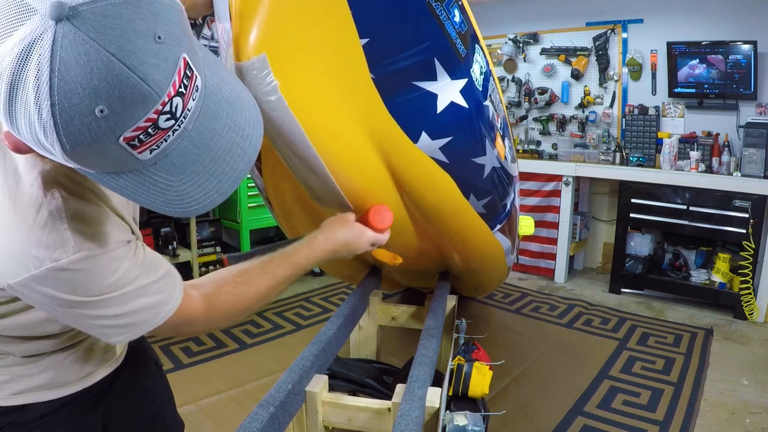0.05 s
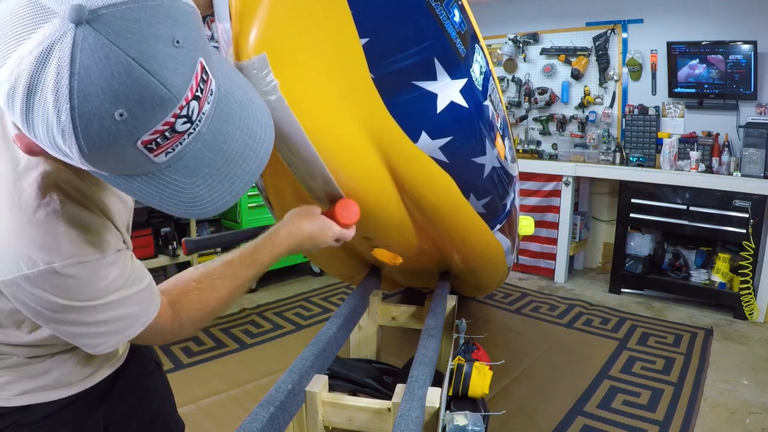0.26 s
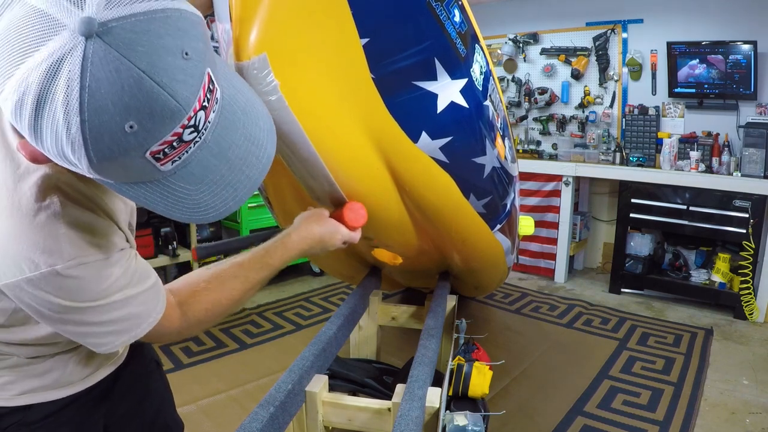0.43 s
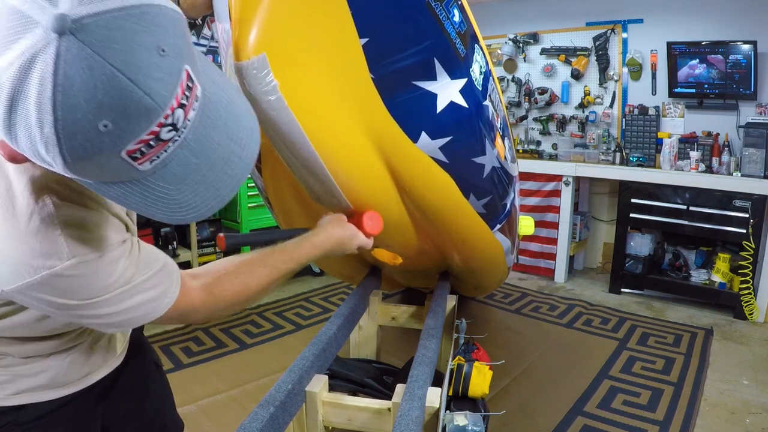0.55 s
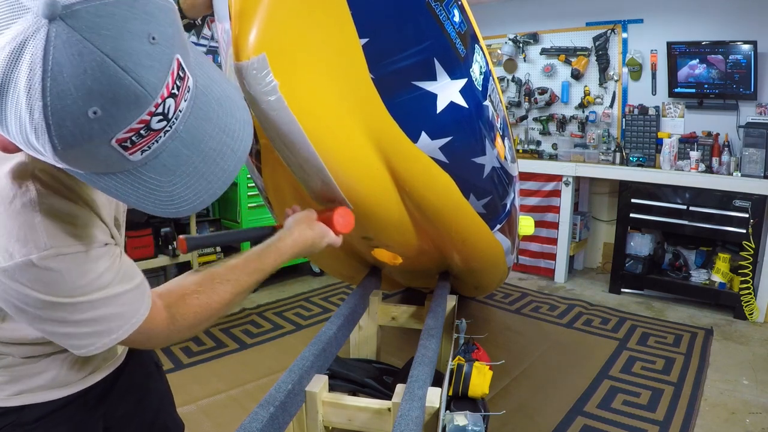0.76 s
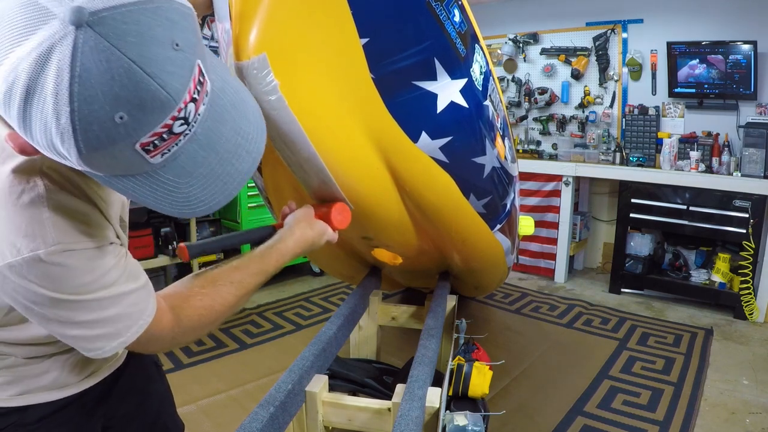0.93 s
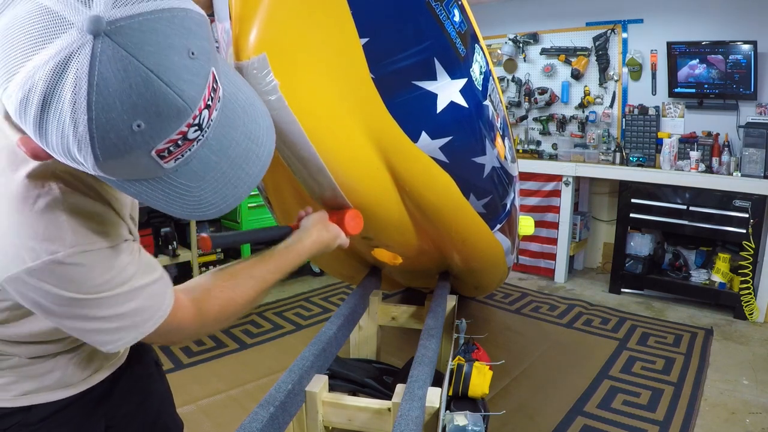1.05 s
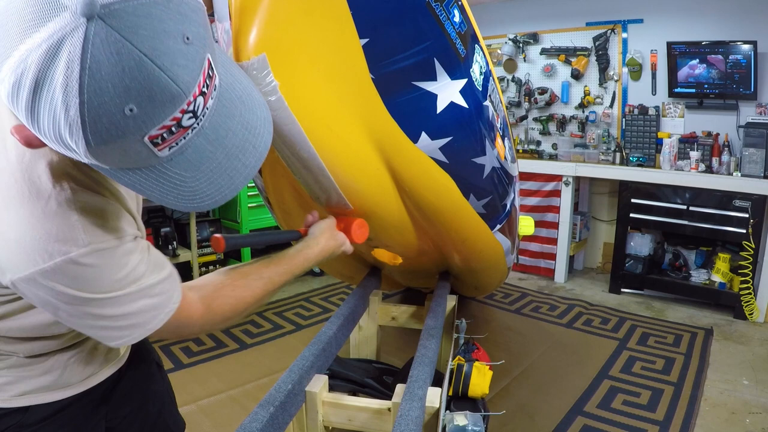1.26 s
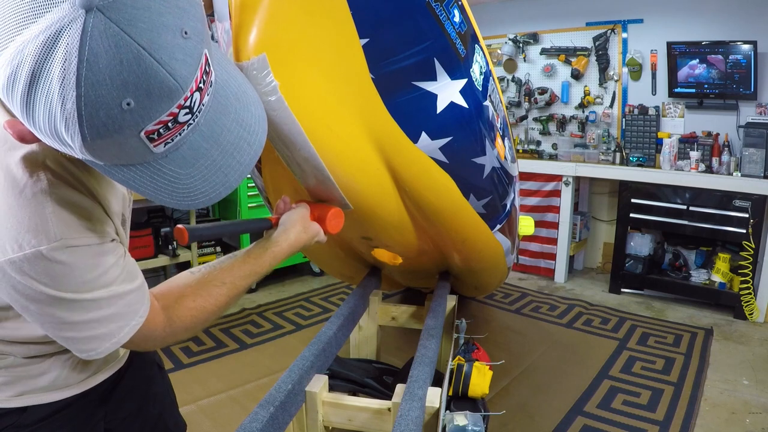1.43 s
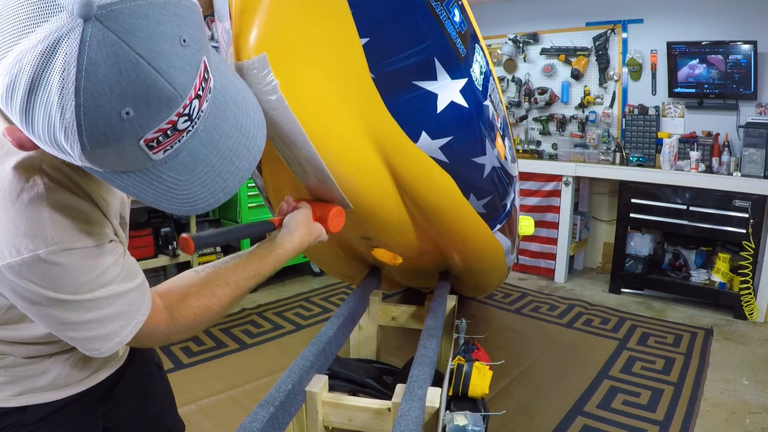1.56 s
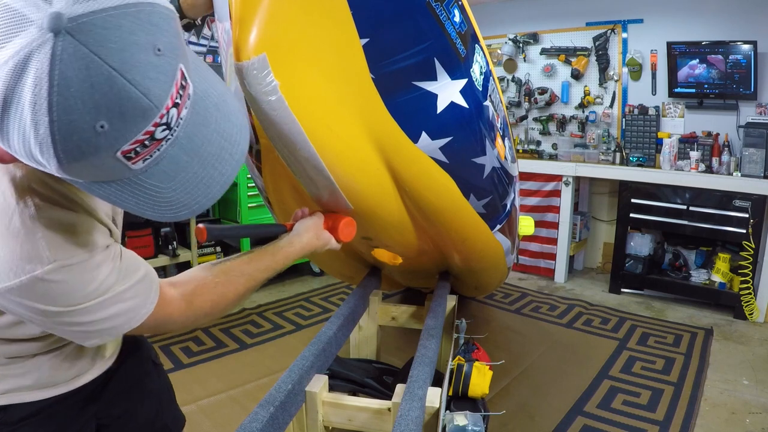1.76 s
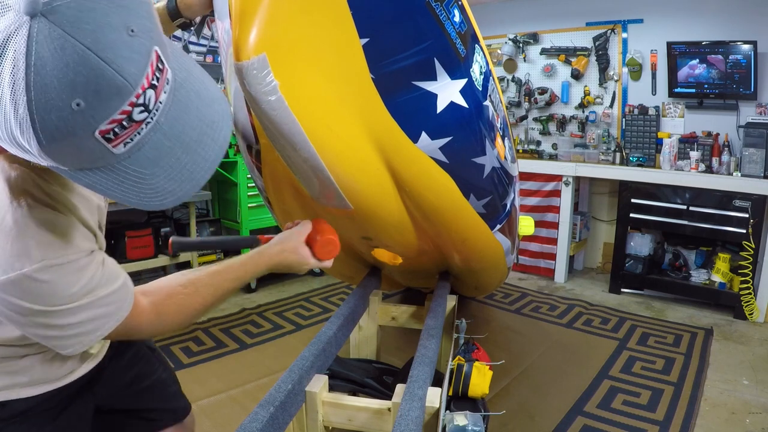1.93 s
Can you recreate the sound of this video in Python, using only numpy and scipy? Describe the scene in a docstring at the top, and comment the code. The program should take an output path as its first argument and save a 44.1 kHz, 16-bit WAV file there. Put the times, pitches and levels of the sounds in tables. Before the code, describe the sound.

A rubber mallet knocks on a hollow plastic kayak three times, each firm blow followed by a lighter tap. The hull booms briefly in a garage, with soft rubbing between blows and a faint machine hum behind.

```python
"""Mallet on a kayak hull

A rubber mallet knocks a plastic kayak in a garage: three firm blows, each followed by a lighter tap.
Bending waves reach the air treble first, the hollow hull booms and the garage rings on.
Between blows the mallet and hand slide softly and nudge the hull, over a faint machine hum."""
import sys
import numpy as np
from scipy import signal
from scipy.fft import rfft, irfft
from scipy.io import wavfile

SR = 44100
rng = np.random.default_rng(int(sys.argv[2]) if len(sys.argv) > 2 else 0)


def wav_record(signal):
    """Record a signal, one row per channel, as 16-bit PCM in the file named by sys.argv[1]."""
    frames = np.transpose(np.atleast_2d(signal))
    bounded = np.clip(frames, -1, 1)
    # unit amplitude maps onto the largest positive 16-bit level
    quanta = np.round(bounded * 32767).astype(np.int16)
    wavfile.write(sys.argv[1], SR, quanta)


N = 88200

# room tone EQ: f/Hz, level/dB
ROOM_TONE_EQ = [(15, -52), (25, 2.5), (90, -1.5), (257, -9), (374, -8), (428, 3), (606, -12.5), (712, -7),
                (1150, -15), (15100, -29.5)]
# hum bands: f/Hz, width/Hz, level/dB
HUM_BANDS = [(306, 53, -76.5), (423, 16, -73.5), (557, 10, -79)]
# garage decay: f/Hz, t60/s
GARAGE_DECAY = [(50, 0.26), (130, 0.32), (350, .5), (920, 0.89), (2400, 0.57), (8000, 0.35)]
# reverb EQ: f/Hz, level/dB
GARAGE_EQ = [(50, -9), (150, 4), (400, 0.5), (750, -0.5), (1150, -4), (2200, 0.5), (6000, -0.5)]
# five resonances of rubbing: f/Hz, width/Hz
SCUFF_BANDS = [(1700, 1770), (3300, 2000), (5200, 2340), (8000, 3120), (13300, 4900)]
# rubbing strokes: t/s, length/s, then level/dB for each scuff band
RUB_STROKES = [(.10, 0.16, -85, -78.5, -96, -98, -99), (0.223, 0.079, -62.5, -70, -72, -74.5, -77),
               (.41, 0.12, -61, -70.5, -80, -77, -79), (0.468, 0.14, -64, -71.5, -73.5, -71, -74.5),
               (.81, 0.082, -82, -77, -81, -76.5, -76), (.93, 0.25, -64, -76, -85, -83, -85),
               (1.044, 0.16, -69.5, -68.5, -83, -69, -76), (1.36, 0.031, -91, -91, -92, -76, -82),
               (1.448, 0.084, -79, -73, -74, -72.5, -79), (1.57, 0.3, -66.5, -77, -93, -81.5, -89),
               (1.678, 0.096, -71, -73.5, -77.5, -73, -83), (1.788, 0.15, -63.5, -71, -72.5, -71.5, -75.5),
               (1.92, 0.088, -69.5, -75.5, -74.5, -74, -79)]
# envelope of the low murmur in the hull: t/s, level/dB
MURMUR_ENVELOPE = [(0, -49.5), (.1, -73.5), (.2, -68.5), (.36, -91), (.45, -51.5), (.6, -55), (.7, -85),
                   (.93, -63), (1.02, -47), (1.15, -49), (1.25, -88), (1.55, -57), (1.65, -51.5),
                   (1.75, -51.5), (1.85, -69), (2, -68.5)]
# small ticks: t/s, level/dB, f/Hz
SMALL_TICKS = [(0.223, -44, 8300), (0.481, -56, 5970), (0.813, -49.5, 6000), (0.826, -53, 4000),
               (1.4322, -50.5, 5450), (1.894, -61, 13680), (1.892, -48, 1930)]
# the mallet head's own ring: f/Hz, level/dB, t60/s
HEAD_MODES = [(2048, 1, 0.012), (2630, 7, 0.004), (3180, -13.5, 0.018)]
# the hollow hull's modes: f/Hz, level/dB, t60/s
HULL_MODES = [(61.6, -6, 0.34), (74.85, -3, 0.33), (104.1, 2.5, 0.162), (141.6, 4.5, 0.25),
              (172, -12, 0.26), (224.6, 2, 0.066), (301.2, 1, 0.14), (365.4, -5.5, 0.13), (518.3, -9, 0.27),
              (585.5, -13, 0.39), (737.7, -10, 0.24), (860, -29.5, 0.27), (949, -10, 0.078),
              (1033, -13.5, 0.11), (1092.6, -18, 0.27), (1515, -8.5, 0.064)]
# EQ of the bending wave: f/Hz, level/dB
WAVE_EQ = [(40, -28), (150, 8.5), (400, 0.5), (1000, 2), (2000, -7), (4000, -20), (9000, -50)]
# its echoes from the hull's edges: delay/s, level/dB
EDGE_ECHOES = [(.0045, -8), (.008, -14), (.0112, -4.), (.017, -13.5), (.023, -9.5), (.031, -9)]
# blows and taps: t/s, level/dB, contact/s, brightness/(dB per octave), boom/dB, upper ring/dB,
# clack/dB, clack delay/s, second touch/dB
MALLET_BLOWS = [(.2270, -15.5, 0.0016, 1.5, -3, -4, -45.5, 0.00067, -25),
                (0.4806, -25, 0.0018, -4., -5, 6, -62, 0.003, -26),
                (0.7948, -20, 0.002, 2.5, 1.5, 7, -70, 0.037, -20.5),
                (1.0449, -30, .002, 0, -0.5, -2, -39.5, 0.00063, -14.5),
                (1.4310, -21.5, 0.0023, 4.5, -2, 7.5, -46, 0.0049, 18),
                (1.6806, -28, 0.0018, -2, -2.5, 9.5, -48.5, 0, -21.5)]
# soft nudges of the hull: same columns
HULL_NUDGES = [(1.008, -49, 0.0097, -2., -6, 0., -80., 0.0092, -20.),
               (1.153, -48, 0.0078, -2.2, 3., 0.0039, -75, 0., -20.),
               (1.645, -42, 0.0064, -1., 5, 0., -80., 0.0074, -13),
               (1.78, -50.5, 0.0042, -0.21, -11, 0.0079, -83, 0., -16)]

ROOM_TONE_DB, REVERB_DB, WAVE_DB = -63.5, -8.5, -3
GRAIN_SPREAD_DB, GRAINS_PER_S = 2, 9800
STROKE_ATTACK = 0.21  # share of a stroke spent rising
BOOM_BELOW_HZ, UPPER_RING_ABOVE_HZ = 160, 800
LOW_CUT_HZ, HIGH_CUT_HZ = 62.4, 15280  # the hull radiates little under the first; the mix ends at the second
TRAVEL_S = .0024  # bending wave's travel time at 1 kHz, longer in the bass
BOUNCE_S, CLACK_ATTACK_S = 0.000943, 0.00032


def amp(db):
    return 10 ** (np.asarray(db) / 20)


def unit_rms(x):
    return x / np.sqrt(np.mean(x ** 2) + 1e-20)


def curve_at(points, hz):
    f, value = np.transpose(points)
    return np.interp(np.log(hz + 1), np.log(f + 1), value)


def place(mix, start, sound):
    part = mix[round(start * SR):][:len(sound)]
    part += sound[:len(part)]


def filtered(x, gain):
    """EQ by a gain per frequency bin, then set the rms to 1."""
    return unit_rms(irfft(rfft(x) * gain, len(x)))


def struck(modes, size):
    """Decaying sines after one impulse."""
    t = np.arange(size) / SR
    return sum(amp(db - 60 * t / t60) * np.sin(2 * np.pi * hz * t) for hz, db, t60 in modes)


def room_tone():
    """A bed of dark noise with the fuzzy hum of distant machines."""
    hz = np.fft.rfftfreq(N, 1 / SR)
    hum = sum(amp(db) * filtered(rng.standard_normal(N), 1 / (1 + (2 * (hz - f) / width) ** 2))
              for f, width, db in HUM_BANDS)
    return amp(ROOM_TONE_DB) * filtered(rng.standard_normal(N), amp(curve_at(ROOM_TONE_EQ, hz))) + hum


def garage_reverb(x):
    """Random reflections, each band dying at its own speed."""
    taps = rng.choice([-1., 1.], SR) * (rng.random(SR) < .1) * (np.arange(SR) > .006 * SR)
    hz, t, spectra = signal.stft(taps, SR, nperseg=512)
    tail_db = curve_at(GARAGE_EQ, hz)[:, None] - 60 * t / curve_at(GARAGE_DECAY, hz)[:, None]
    tail = signal.istft(spectra * amp(tail_db), SR, nperseg=512)[1]
    tail[:250] = 0  # pre-delay
    return signal.fftconvolve(x, tail / np.linalg.norm(tail))[:N]


def slide():
    """Mallet and hand rub: friction grains scuff in broad bands and murmur through the hull."""
    t, hz = np.arange(N) / SR, np.fft.rfftfreq(N, 1 / SR)
    grains = rng.standard_normal(N) * amp(GRAIN_SPREAD_DB * rng.exponential(1, N))
    grains *= rng.random(N) < GRAINS_PER_S / SR
    bands = [filtered(grains, 1 / (1 + (2 * (hz - f) / width) ** 4)) for f, width in SCUFF_BANDS]
    short_ring = hull_ring(boom_db=-4.5, upper_db=0)[:3000] * np.hanning(6000)[3000:]
    murmur = unit_rms(signal.fftconvolve(grains, short_ring)[:N])
    mix = murmur * amp(np.interp(t, *np.transpose(MURMUR_ENVELOPE)))
    for start, length, *levels_db in RUB_STROKES:
        ramp = np.interp(t, start + length * np.array([0, STROKE_ATTACK, 1]), [0, 1, 0])
        mix += np.sin(np.pi / 2 * ramp) * sum(amp(db) * band for db, band in zip(levels_db, bands))
    return mix


def tick(level_db, hz):
    """A tiny ping, gone in about 3 ms."""
    return struck([(hz, level_db, 0.0029)], 200)


def mallet_clack():
    """The head rings briefly as it touches."""
    attack = np.minimum(np.arange(2000) / SR / CLACK_ATTACK_S, 1)
    return struck(HEAD_MODES, 2000) * attack


def hull_ring(boom_db, upper_db):
    """The hull's modes after one impulse, with trims on the boom and the upper ring."""
    modes = [(hz, db + boom_db * (hz < BOOM_BELOW_HZ) + upper_db * (hz > UPPER_RING_ABOVE_HZ), t60)
             for hz, db, t60 in HULL_MODES]
    return struck(modes, SR // 2)


def blow(start, level_db, contact_s, bright_db, boom_db, upper_db, clack_db, clack_delay, bounce_db):
    """A soft push travels as a bending wave, echoes off the edges and rings the hull: (start, sound)."""
    size, pre_roll = SR // 2, .005
    hz, t = np.fft.rfftfreq(size, 1 / SR), np.arange(size) / SR

    def delay(seconds):
        return np.exp(-2j * np.pi * hz * seconds)

    push = amp(bright_db * np.log2(1 + hz / 500)) / (1 + (hz * contact_s) ** 2)  # long contact is dull
    low_cut = 1 / np.sqrt(1 + (LOW_CUT_HZ / (hz + 1)) ** 8)
    bounce = 1 + amp(bounce_db) * delay(BOUNCE_S)  # the head touches twice
    travel = np.exp(-4j * np.pi * TRAVEL_S * np.sqrt(1000 * hz)) * delay(-.001)  # treble first
    drive = push * low_cut * bounce * travel * delay(pre_roll)
    echoes = sum(amp(db) * delay(lag) * travel ** .5 for lag, db in EDGE_ECHOES)
    wave = -irfft(drive * amp(curve_at(WAVE_EQ, hz)) * (1 + echoes), size)
    ring = irfft(drive * rfft(hull_ring(boom_db, upper_db)), size)
    body = amp(WAVE_DB) * wave / abs(wave).max() + ring / abs(ring).max()
    fades = np.clip((t - .004) / .0015, 0, 1) * np.clip((.45 - t) / 0.035, 0, 1)
    sound = amp(level_db) * body * fades
    place(sound, pre_roll + clack_delay, amp(clack_db) * mallet_clack())
    return start - pre_roll, sound


def scene():
    """Knocks and ticks feed the reverb; rubbing and room tone stay dry. Mono."""
    knocks = np.zeros(N)
    for row in MALLET_BLOWS + HULL_NUDGES:
        place(knocks, *blow(*row))
    for start, level_db, hz in SMALL_TICKS:
        place(knocks, start, tick(level_db, hz))
    return (knocks + amp(REVERB_DB) * garage_reverb(knocks) + slide() + room_tone())[None]


def record(dry):
    """A steep high cut on the whole mix."""
    high_cut = signal.firwin(1023, HIGH_CUT_HZ, window=("kaiser", 10), fs=SR)
    return signal.oaconvolve(dry, high_cut[None], "same")


dry = scene()
out = record(dry)
wav_record(out)
```